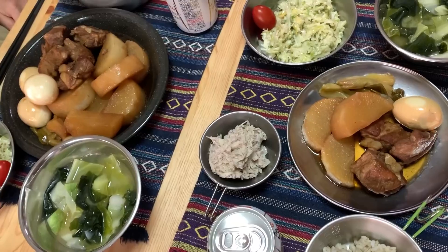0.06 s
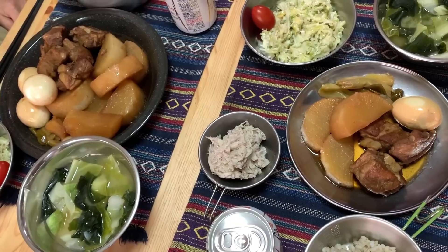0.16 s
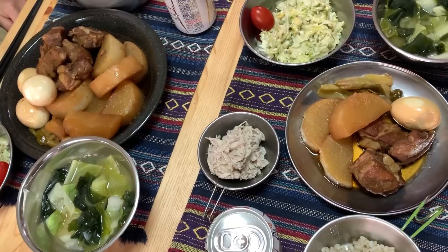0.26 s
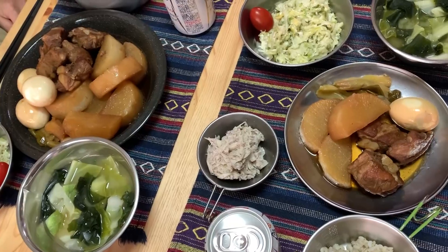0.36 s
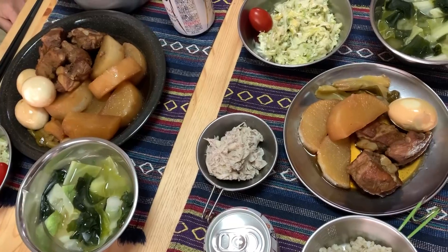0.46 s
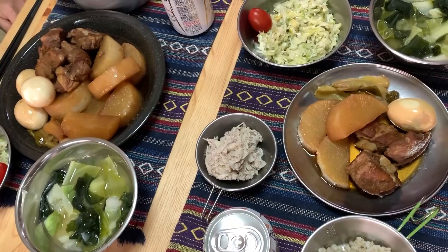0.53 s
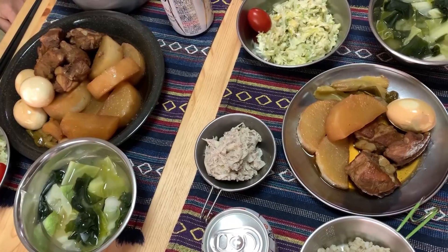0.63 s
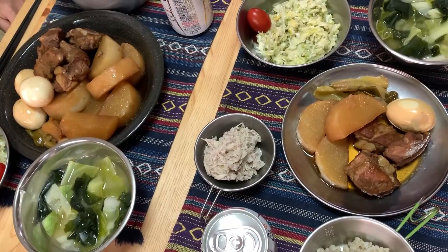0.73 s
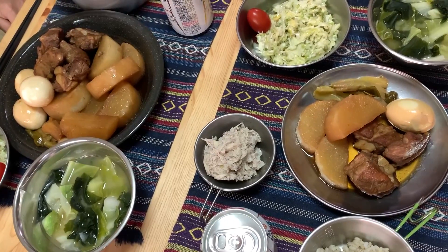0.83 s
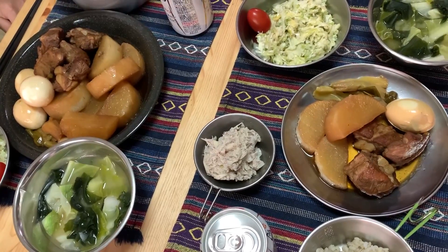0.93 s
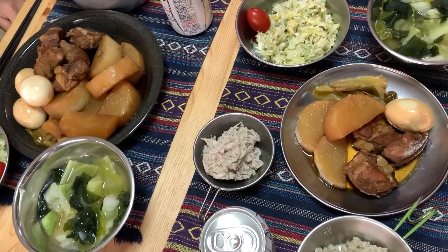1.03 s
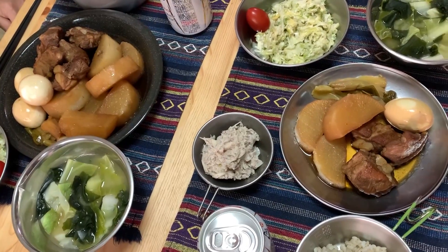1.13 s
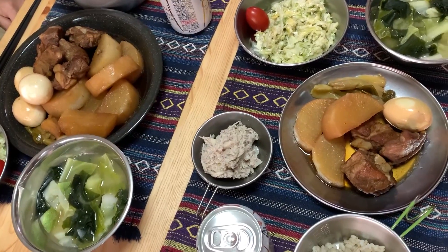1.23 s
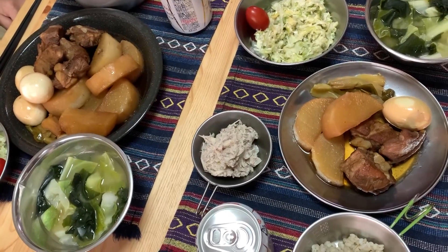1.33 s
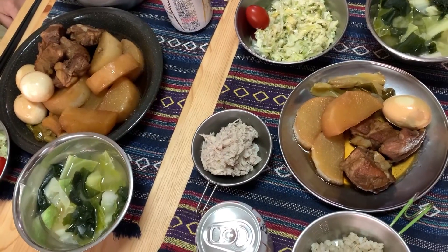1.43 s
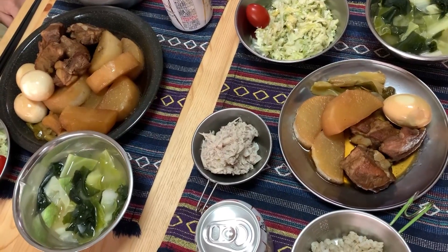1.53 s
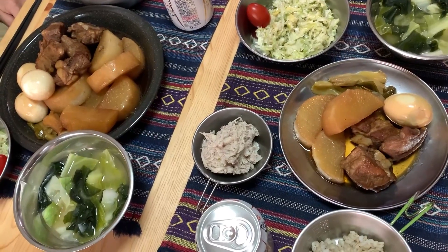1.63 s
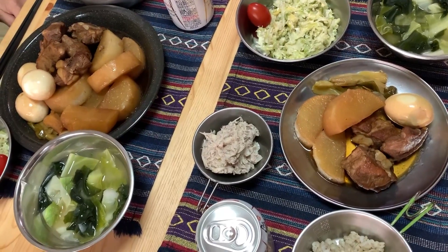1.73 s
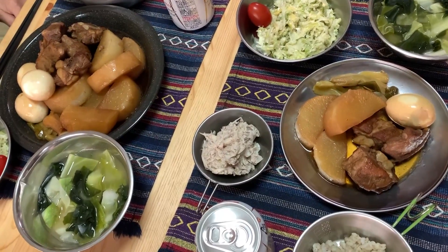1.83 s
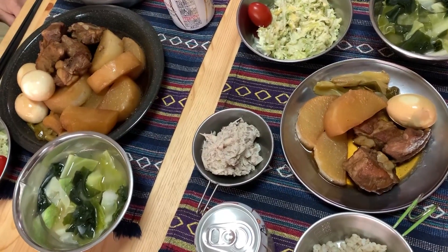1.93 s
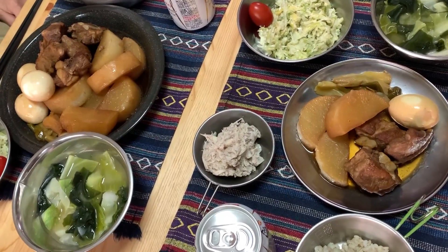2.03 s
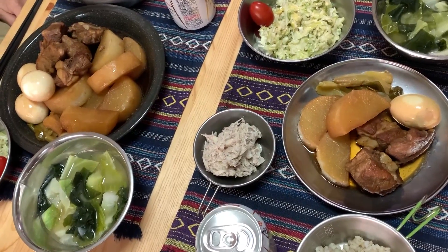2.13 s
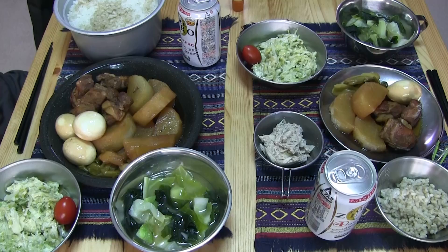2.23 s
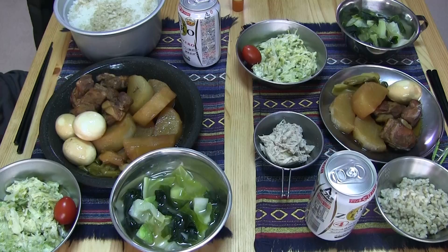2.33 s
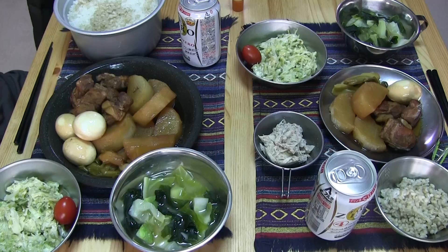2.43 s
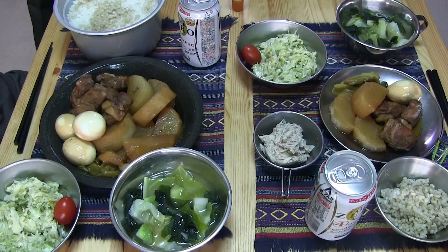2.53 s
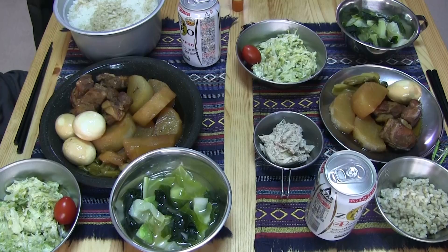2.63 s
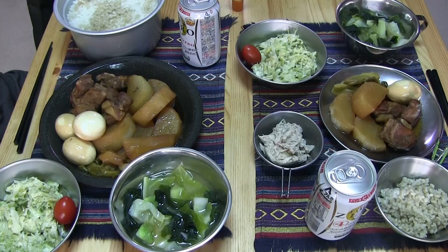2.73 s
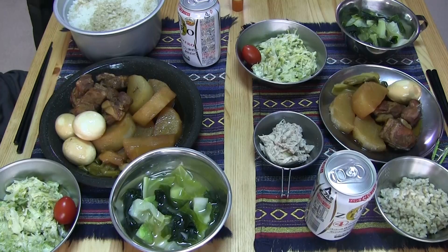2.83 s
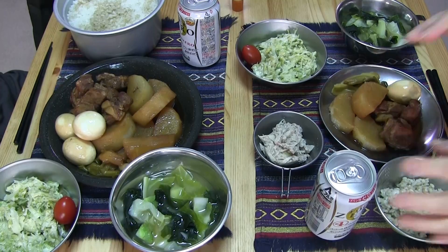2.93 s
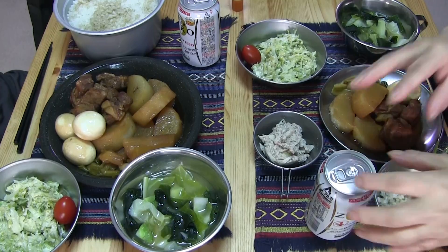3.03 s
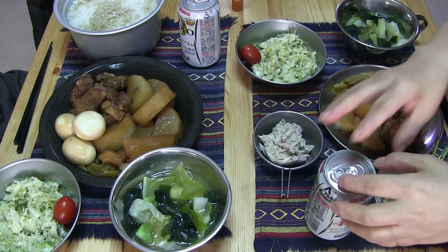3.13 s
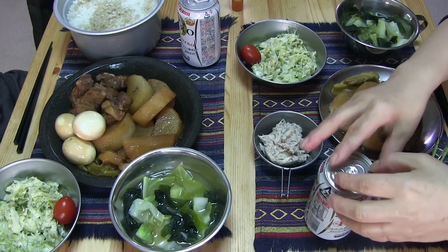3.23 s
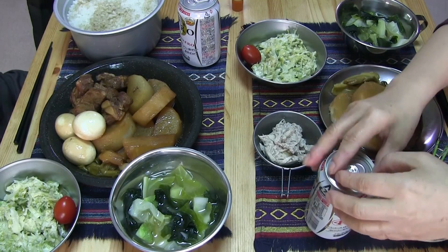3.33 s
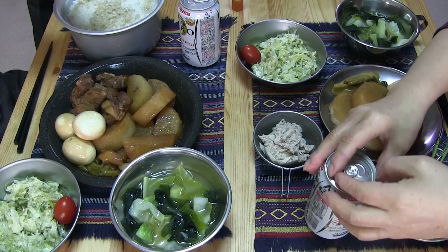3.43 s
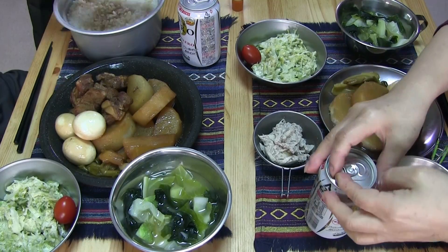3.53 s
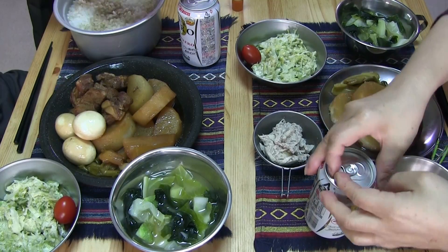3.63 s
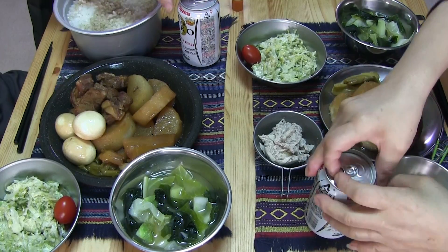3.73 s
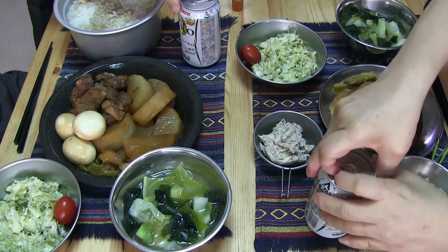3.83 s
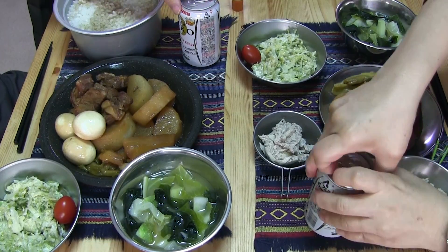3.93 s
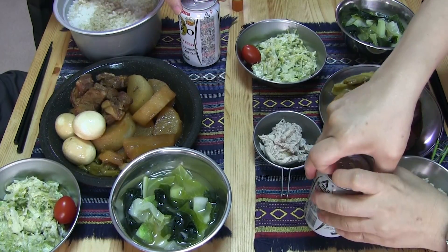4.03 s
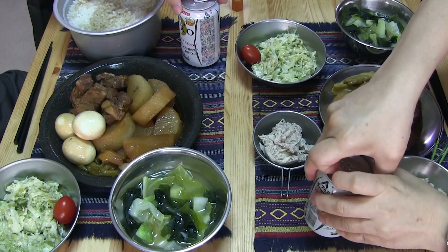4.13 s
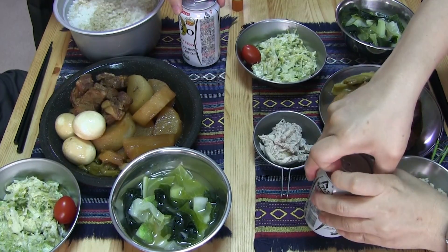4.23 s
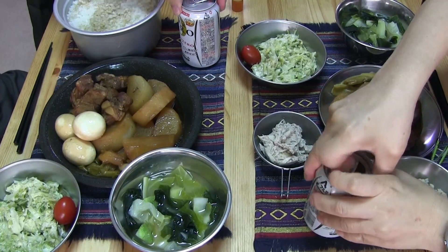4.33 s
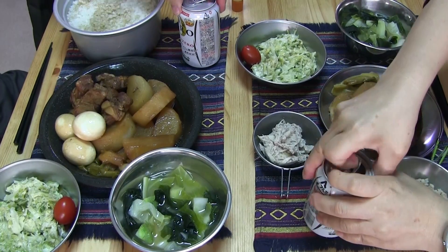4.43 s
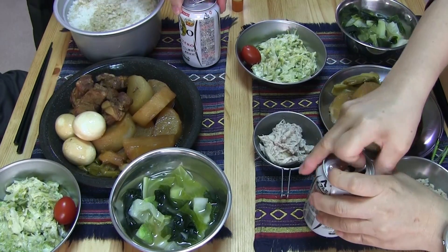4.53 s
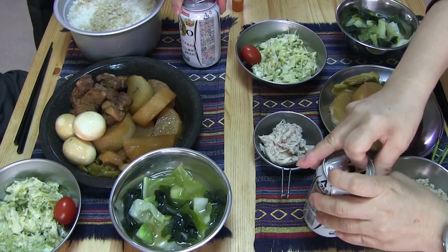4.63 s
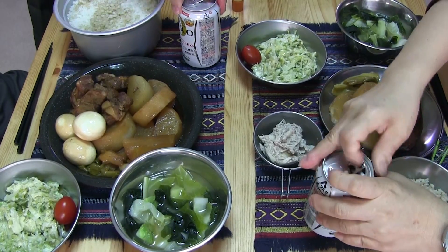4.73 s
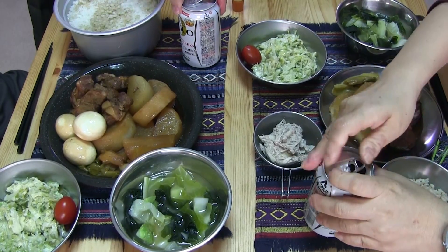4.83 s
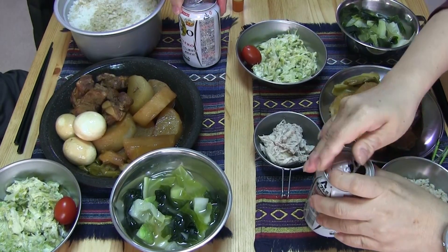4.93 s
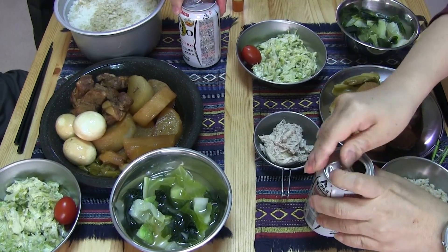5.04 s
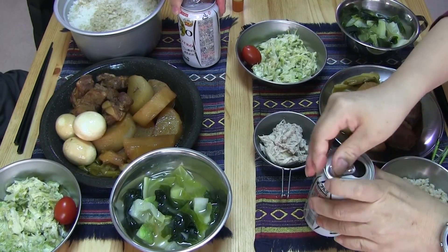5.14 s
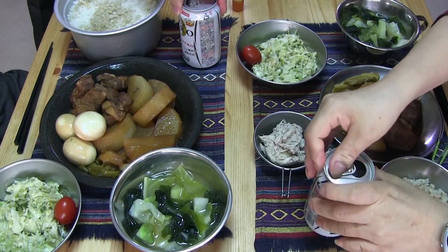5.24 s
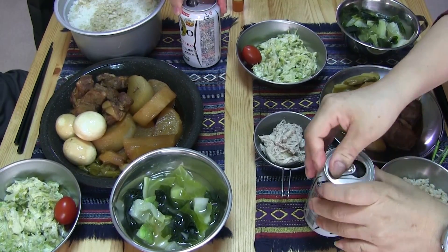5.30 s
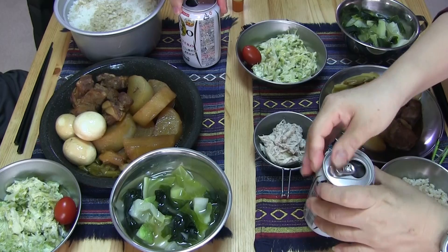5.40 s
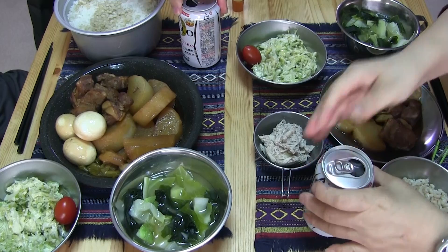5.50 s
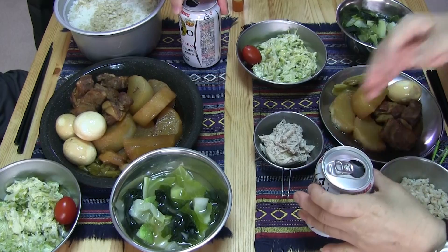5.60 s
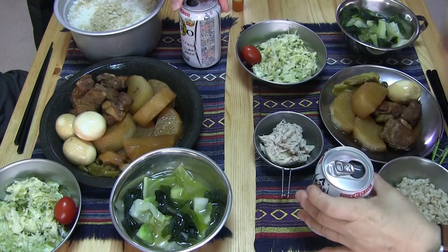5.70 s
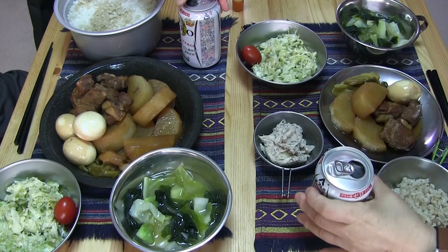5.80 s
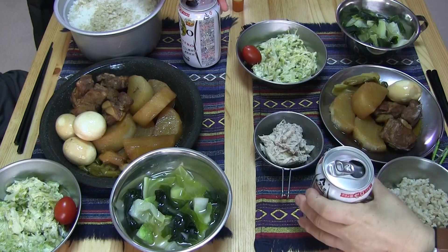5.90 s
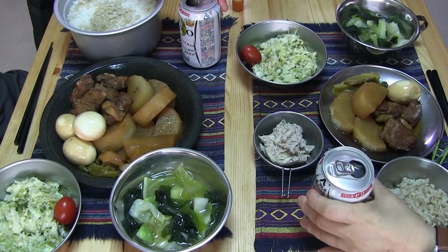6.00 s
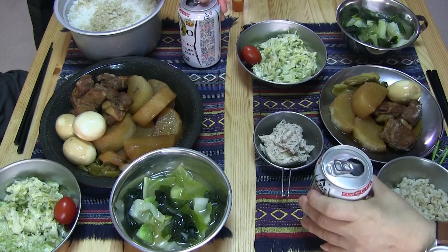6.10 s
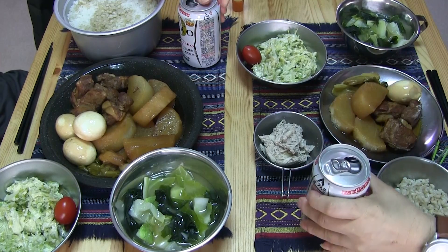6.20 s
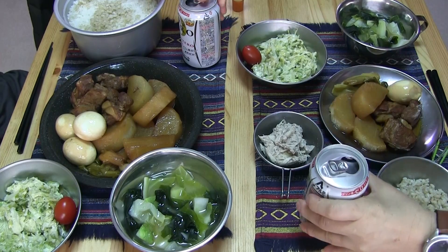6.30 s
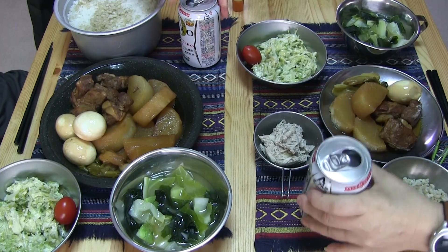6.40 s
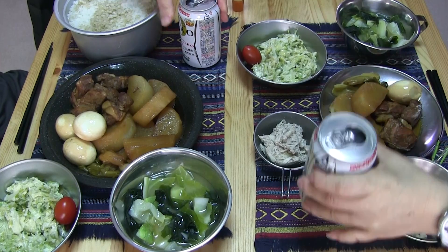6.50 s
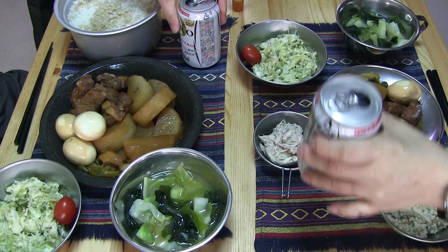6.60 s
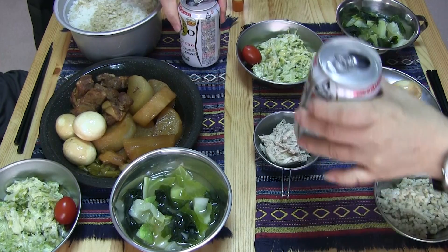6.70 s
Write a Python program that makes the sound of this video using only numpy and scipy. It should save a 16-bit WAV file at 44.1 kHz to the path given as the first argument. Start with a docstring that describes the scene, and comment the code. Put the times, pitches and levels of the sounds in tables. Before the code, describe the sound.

Close stereo pickup in a small, quiet dining room. First only dull hush and distant tinkling metal, then a clean break into airier background noise. Soft knocks and fingernail ticks on an aluminium can lead to a bright crack and brief gas spurt, a violent tinny snap, another crack with a longer hiss, and a second snap with a hollow can boom. The background dips after the loud peaks and slowly returns, with faint clinks.

```python
"""A dull hush with a thin whine and the faint clinks of a metal rod come first; then the hush breaks off and,
after a short silence, the scene changes: a louder, airy noise fills a small, quiet room. At a dining table
hands knock an aluminium drink can and pick at its tab; the seal cracks twice and lets gas hiss out, and the lid
tears open in two snaps. Blows are made of fading tones plus a burst of noise, gas and room of shaped noise.
Loud peaks make a gain control turn everything down; the room noise then creeps back."""
import sys
import numpy as np
from scipy import signal
from scipy.fft import rfft, irfft, next_fast_len
from scipy.io import wavfile
from scipy.ndimage import uniform_filter1d

SR = 44100
rng = np.random.default_rng(int(sys.argv[2]) if len(sys.argv) > 2 else 0)


def file_out(sig):
    """Save sig as 16-bit WAV at sys.argv[1]."""
    # one column per channel
    cols = np.atleast_2d(sig).T
    # limit, then scale
    lim = np.clip(cols, -1, 1)
    pcm = np.round(lim * 32767).astype(np.int16)
    wavfile.write(sys.argv[1], SR, pcm)


N = 298116
TIME = np.arange(N) / SR  # seconds
HUSH_END_S, AIR_START_S = 2.203, 2.236  # silence in between

# Levels of the sources are those before the final gain control.
# The two snaps that tear the lid. Each row: main jerk in seconds, its level in dB, brightness in dB per
# octave, ring length factor, noise against ring in dB, how much earlier the score first gives in seconds,
# level of that give in dB, time to the second jerk in seconds, fall per jerk in dB,
# boom of the body in dB, pop of the opening in dB.
LID_SNAPS = [(4.4526, -4, -2, .65, -1.5, 0.00075, -25.5, .0028, 4, -30, -23),
             (5.3113, -5, 3.5, 0.4, 2, .004, -9, .0018, 2, -16.5, -29)]
BOOM_NOISY_DB = -5  # noise against ring, for booms and pops

# Noise of metal being struck or torn. Each row: frequency in Hz, relative level in dB.
METAL_NOISE = [(100, -33.5), (500, -18), (1400, 4.5), (2300, 4.5), (4000, 7.5), (8000, 1), (12000, -0.5),
               (16000, -11.5)]
# Dull noise of a scuff. Each row: frequency in Hz, relative level in dB.
SCUFF_NOISE = [(50, -12.5), (120, -4.5), (450, -2.5), (1100, -1), (1900, -5), (2800, -18), (7000, -21.5),
               (15000, -35.5)]


def tears():
    """The lid tears along its score: every jerk rings the many short tones of the thin sheet."""
    # Tones of the lid. Each row: frequency in Hz, relative level in dB, time to fade by 60 dB in seconds.
    lid = [(820, -13, 0.014), (1082, -6.5, 0.09), (1270, -5.5, 0.049), (1580, 3.5, 0.0023),
           (2150, -1.5, .022), (2400, -13.5, 0.004), (3180, -2.5, 0.023), (3760, -4, .014),
           (4030, 0, 0.053), (4500, -8.5, 0.0089), (4330, -1, 0.011), (5460, -12.5, 0.0083),
           (6200, -5, 0.0099), (6880, 2.5, .014), (7500, -8, 0.014), (8600, -9, 0.0077), (8650, -0.5, .014),
           (10740, 2.5, .012), (12900, -15.5, .01)]
    return strike(jerks(), lid, METAL_NOISE, crunch_s=0.0075, split=0.045, contact_s=0.00024)


def jerks(count=4):
    """In a snap the score gives a little, then rips in jerks that grow weaker and slightly closer together."""
    spacing_power = 0.9  # below 1, so the gaps shrink
    blows = []
    for s, db, bright_db, ring, noisy_db, lead_s, give_db, gap_s, fall_db, *_ in LID_SNAPS:
        first_give = [(s - lead_s, give_db, bright_db)]
        run = [(s + gap_s * k ** spacing_power, db - fall_db * k, bright_db) for k in range(count)]
        blows += alike(first_give + run, ring, noisy_db)
    return blows


def booms():
    """Each snap sets the body of the can booming, just after the main jerk."""
    # Tones of the body. Each row: frequency in Hz, relative level in dB, time to fade by 60 dB in seconds.
    body = [(143.7, 1.5, 0.42), (196, -6.5, .15), (250, -5.5, 0.23), (656, -3.5, 0.061)]
    lag_s, ring_factor = .002, 0.62
    blows = [(s + lag_s, db, 0, ring_factor, BOOM_NOISY_DB) for s, *_, db, _ in LID_SNAPS]
    return strike(blows, body, SCUFF_NOISE, crunch_s=.006, split=.03, contact_s=0.00041)


def pops():
    """The air in the opening pops with each snap, ringing at two low tones."""
    # Tones of the air. Each row: frequency in Hz, relative level in dB, time to fade by 60 dB in seconds.
    mouth = [(710, -1, .03), (1111, 0, .02)]
    blows = [(s, db, 0, 1, BOOM_NOISY_DB) for s, *_, db in LID_SNAPS]
    return strike(blows, mouth, SCUFF_NOISE, crunch_s=.006, split=0.055, contact_s=.0005)


def cracks():
    """The scored seal cracks under pressure, with very short, bright rings."""
    # Each row: start in seconds, level in dB, brightness in dB per octave, ring length factor,
    # noise against ring in dB.
    crack_events = [(4.1917, -18.5, -5, 1.5, -2.5), (4.1983, -27.5, 2.5, 1.6, -5),
                    (4.8641, -11, 7, 1.1, -3.5), (4.8705, -29, 9, 1.2, -2.5)]
    # Tones of the seal. Each row: frequency in Hz, relative level in dB, time to fade by 60 dB in seconds.
    seal = [(3500, -2, 0.011), (4030, -1, 0.032), (4700, 2, 0.0089), (5260, -8.5, 0.036),
            (6230, -5, 0.0037), (7460, -3.5, .006), (8800, -4.5, .006), (10400, -5.5, .004)]
    # Noise of the crack. Each row: frequency in Hz, relative level in dB.
    seal_noise = [(300, -22.5), (2500, -19), (3400, 0), (8000, -2), (12000, -6.5), (16000, -10.5)]
    return strike(crack_events, seal, seal_noise, crunch_s=0.0029, split=0.07, contact_s=.0001)


def gas():
    """Gas escapes through the slit after each crack of the seal."""
    # Each row: slit opens in seconds, time constant of the rise in seconds, slit slackens in seconds,
    # jet in dB and spray in dB against the jet (both at full flow), scatter of droplet sizes in dB.
    vents = [(4.212, 0.016, 4.273, -17.5, -12.5, 0.5), (4.911, 0.015, 5.081, -18, -27, 7.5)]
    return sum(vent(*row) for row in vents)


def vent(opens_s, attack_s, slackens_s, jet_db, spray_db, grain_db):
    """Gas rushes through the slit as a bright jet and spits a spray of tiny droplets."""
    # Sound of the jet. Each row: frequency in Hz, relative level in dB.
    jet_spectrum = [(500, -41), (2600, -26.5), (4000, -15), (5500, -8.5), (7400, -7.5), (8600, -0.5),
                    (9800, 0.5), (11500, 0), (14000, -1), (16000, -10)]
    # Sound of the droplets. Each row: frequency in Hz, relative level in dB.
    spray_spectrum = [(200, -10), (700, -7), (1400, -0.5), (2200, -0.5), (4000, 1.5), (7000, -3.5),
                      (15000, -19)]
    release_db_per_s = 401
    opening = 1 - np.exp(-np.maximum(TIME - opens_s, 0) / attack_s)
    flow = opening * undb(-release_db_per_s * np.maximum(TIME - slackens_s, 0))
    # the jet flutters by a fraction of a dB
    flutter = undb(0.6 * unit(uniform_filter1d(rng.standard_normal(N), size=200)))
    jet = colour(rng.standard_normal(N), jet_spectrum) * flutter
    # a droplet falls on about 15 in 100 samples
    present = rng.random(N) < .15
    drops = rng.standard_normal(N) * present * undb(grain_db * rng.standard_normal(N))
    spray = undb(spray_db) * colour(drops, spray_spectrum)
    return flow * undb(jet_db) * (jet + spray)


def picks():
    """A fingernail picks at the tab, which rings higher once it is bent up, and skids over the lid."""
    # Each row: start in seconds, level in dB, brightness in dB per octave, pitch factor.
    pick_events = [(3.255, -34.5, 3.5, 1.04), (3.274, -37, 0, 1.06), (3.404, -51, -7, 1.06),
                   (3.8302, -37, 10, 0.98), (4.323, -41, 4, 1.02), (4.381, -47, 7, 0.9),
                   (4.425, -42, 3, 1.08), (4.4435, -38, 3, 1), (5.26, -43.5, -6, 1.7),
                   (5.2825, -38.5, -2, 1.65), (5.975, -52, -2, 1.38)]
    # Tones of the tab. Each row: frequency in Hz, relative level in dB, time to fade by 60 dB in seconds.
    tab = [(2280, 3.5, 0.12), (3510, -1, 0.076), (5080, -4.5, 0.069), (5600, -3, .04), (7130, -6, 0.042),
           (8350, -12.5, .04)]
    blows = alike(pick_events + skids(), ring=0.97, noisy_db=-3)
    return strike(blows, tab, METAL_NOISE, crunch_s=0.017, split=.03, contact_s=.0004)


def skids(count=7):
    """Unevenly spaced ticks that fade as the nail comes to rest."""
    # Each row: start in seconds, length in seconds, level at the start in dB.
    skid_events = [(3.284, .22, -46), (3.845, .26, -48.5)]
    fade_db = 12  # over the whole skid
    bright_db = 4  # per octave
    ticks = []
    for s, length, db in skid_events:
        # squaring crowds the ticks together at the start
        progress = ((np.arange(count) + rng.random(count)) / count) ** 2
        ticks += [(s + length * p, db - fade_db * p, bright_db) for p in progress]
    return ticks


def flexes():
    """The thin wall flexes under the fingers and rings higher where it is taut."""
    # Each row: start in seconds, level in dB, brightness in dB per octave, noise against ring in dB,
    # pitch factor.
    flex_events = [(4.665, -33, 17, 13, 0.49), (4.8595, -29, -13, -9, 0.98), (5.135, -43, 14.5, 2, 1.12),
                   (5.1736, -43, -6, -9, 1.18), (5.2075, -35.5, 0.5, -15.5, 1.05),
                   (5.8305, -34.5, -3.5, -9.5, 1.04)]
    # Tones of the wall. Each row: frequency in Hz, relative level in dB, time to fade by 60 dB in seconds.
    wall = [(1090, -0.5, 0.15), (1390, -4.5, 0.078), (1390, -9.5, 0.045), (2250, -8, .05),
            (3330, -3.5, 0.021)]
    # Noise of the flexing. Each row: frequency in Hz, relative level in dB.
    wall_noise = [(200, -10.5), (800, -14), (1400, -1), (3100, -3), (4200, -14), (8000, -17),
                  (15000, -35.5)]
    ring_factor = .55
    blows = [(s, db, bright_db, ring_factor, noisy_db, pitch)
             for s, db, bright_db, noisy_db, pitch in flex_events]
    return strike(blows, wall, wall_noise, crunch_s=.008, split=0.051, contact_s=0.00083)


def knocks():
    """The hand knocks and scuffs the can on the table, which answers with low, short tones."""
    # Each row: start in seconds, level in dB, brightness in dB per octave.
    knock_events = [(3.187, -32, 5), (3.205, -49, 15), (3.28, -39, -5), (3.296, -42.5, -2),
                    (4.832, -47, -12.5)]
    # Tones of the table. Each row: frequency in Hz, relative level in dB, time to fade by 60 dB in seconds.
    table = [(116, -13.5, 0.22), (203, -22.5, 0.14), (314, 5.5, 0.28), (503, 7, 0.3), (803, 11, .06),
             (1107, 14, 0.03), (1423, -6, 0.061), (1970, -5, 0.058)]
    blows = alike(knock_events, ring=.9, noisy_db=4.5)
    return strike(blows, table, SCUFF_NOISE, crunch_s=0.03, split=0.17, contact_s=0.00078)


def can():
    """All sounds of the can, close by on the table, with their echoes in the room."""
    # The hands shade one side of the can. Each row: time in seconds, left minus right in dB.
    shade = [(3.8, 1.5), (4.19, -5), (4.24, -1.5), (4.45, -2), (4.86, 0.5), (5.3, 1)]
    shade_db, = curve(shade)
    handling = knocks() + picks() + flexes() + pops()
    cracking, tearing, booming, hiss = cracks(), tears(), booms(), gas()
    # each part of the can radiates its own way; the long waves of the boom reach both channels alike
    direct = near(handling, shade_db, spread=.25) + near(cracking, shade_db, spread=.35)
    direct = direct + near(tearing, shade_db, spread=0.46) + near(hiss, shade_db, spread=.25) + booming
    into_room = undb(1.5) * handling + undb(-0.5) * cracking + undb(1) * tearing
    into_room = into_room + undb(-3.0) * hiss + undb(-16) * booming
    return direct + room(into_room)


def rod():
    """A small metal rod rings faintly far off to the left: it reaches the right later, and the walls echo it."""
    # Clinks, and at 0.60 s a soft swell of the lowest tone.
    # Each row: start in seconds, level in dB before the drops and gains below, brightness in dB per octave.
    rod_events = [(0.173, -60.5, 3), (.286, -58.5, 0.5), (.515, -52.5, -4.5), (.60, -54.5, -28),
                  (.70, -44, -1), (1.185, -51, 2), (1.302, -49.5, 4), (1.77, -52.5, 2.5),
                  (1.895, -50.5, 1.5), (2.104, -60, 0), (6.185, -50.5, -0.5), (6.675, -51.5, 3)]
    # Tones of the rod. Each row: frequency in Hz, relative level in dB, time to fade by 60 dB in seconds.
    rod_tones = [(2079, -6, 0.44), (5580, 1.5, 0.15), (9940, -9, 0.091), (10200, -5.5, 0.057),
                 (10700, -18, 0.064), (15200, -13, 0.12)]
    right_lag_s = .00046
    # every sound is a short, soft, wavering ring built from three overlapping onsets: (seconds later, dB)
    onset_steps = [(0, -2.5), (.017, -9.5), (.038, -6.5)]
    onsets = [(s + lag, db + drop_db, bright_db)
              for s, db, bright_db in rod_events for lag, drop_db in onset_steps]
    rings = strike(alike(onsets, ring=0.9, noisy_db=-21.5), rod_tones, METAL_NOISE,
                   crunch_s=0.0082, split=0.0015, contact_s=0.001)
    left = undb(-4.5) * rings
    right = undb(-4) * np.roll(rings, int(right_lag_s * SR))
    return np.array([left, right]) + undb(4) * room(rings)


def rustles():
    """Brief soft swishes in the room: noise that swells and sinks."""
    # Each row: loudest moment in seconds, level there in dB, length in seconds (peak to about a third).
    rustle_events = [(0.33, -72, 0.024), (0.397, -74, 0.054), (2.294, -47.5, 0.023)]
    spectrum = [(100, 5), (400, 8.5), (1200, 10.5), (2000, 4.5), (3000, -10), (12000, -15)]  # Hz, dB
    return swells(rustle_events) * colour(diffuse(N), spectrum)


def background():
    """A dull hush with a thin whine breaks off; after it comes a louder, airy room noise."""
    # Sound of the hush. Each row: frequency in Hz, relative level in dB.
    hush_spectrum = [(25, -58), (50, -18.5), (75, -22.5), (105, -9), (140, -8.5), (260, -17.5),
                     (400, -24.5), (800, -32), (1400, -38), (3000, -45.5), (11000, -54), (15000, -52)]
    # Sound of the airy noise. Each row: frequency in Hz, relative level in dB.
    air_spectrum = [(15, -31), (25, 3.5), (44, 3), (76, -11), (161, -4.5), (200, -13), (256, -6.5),
                    (293, -12.5), (354, -9), (405, -14.5), (575, -13.5), (1610, -23), (5000, -27.5),
                    (14000, -34), (16000, -45)]
    # Low rumbles swell and sink. Each row: loudest moment in seconds, level there in dB (before the
    # standing waves, during the hush), length in seconds (peak to about a third).
    rumble_events = [(1.775, -46, .03), (1.87, -47, .04), (2.15, -64.5, .15), (4.33, -53.5, .1),
                     (6.7, -49, .12)]
    hush = colour(diffuse(N, alike_hz=513, treble_side=1.0), hush_spectrum)
    # only the low drone of the house sways at random
    drone = signal.sosfiltfilt(signal.butter(2, 350, fs=SR, output="sos"), hush)
    drone_db = -61.5 + 2.2 * sway(per_s=9)  # before the standing waves
    whine = undb(-88.5) * np.sqrt(2) * np.sin(2 * np.pi * 1223 * TIME)
    hush = drone * undb(drone_db) + (hush - drone) * undb(-65) + whine
    air = colour(diffuse(N, alike_hz=230, treble_side=0.62), air_spectrum) * undb(-48)
    rumble_spectrum = [(15, -7.5), (40, 0.5), (70, -15.5), (170, -20.5), (400, -35), (2000, -75.0)]  # Hz, dB
    rumble = colour(diffuse(N, alike_hz=100), rumble_spectrum)
    surge = swells(rumble_events)
    before, after = TIME < HUSH_END_S, TIME > AIR_START_S
    # a weak steady rumble lies under each noise
    hush = standing_waves(before * (hush + rumble * (surge + undb(-86))))
    air = air + rumble * (surge + undb(-66.5))
    return hush * before + air * after


def standing_waves(x):
    """The room favours a few low notes and thins out the bass between them."""
    # Each row: frequency in Hz, width in Hz, level of the added peak in dB.
    waves = [(49.8, 16, 5.5), (89.6, 11, 2.5), (119, 4.5, -1.5), (145, 3.4, 5), (171.3, 4.8, 4.5),
             (262, 12.3, 3), (342.4, 20, -4.5)]
    between_db = -2
    bins = np.fft.rfftfreq(N, 1 / SR)
    peaks = sum(undb(db) / (1 + (2 * (bins - hz) / width) ** 2) for hz, width, db in waves)
    between = undb(np.interp(bins, [20, 60, 300, 500], [-15, between_db, between_db, 0]))
    return irfft(rfft(x) * (between + peaks), N)


def room(x):
    """Dense echoes of a small room, band by band, each fading at its own pace."""
    # Each row: band centre in Hz, time to fade by 60 dB in seconds, relative level in dB.
    bands = [(150, 0.45, 3), (510.3, .3, -5.5), (1403, .33, -6), (3500, 0.26, -7), (8000, 0.24, -6.5),
             (15100, 0.2, -15)]
    t = np.arange(SR // 2) / SR
    hz, t60, db = np.transpose(bands)
    bins = np.log(np.fft.rfftfreq(len(t), 1 / SR) + 1)
    noise = rfft(diffuse(len(t), alike_hz=641, treble_side=0.56))
    # the echoes set in 4 ms after the sound
    build_up = np.clip((t - .004) / 0.00057, 0, 1)
    response = 0
    for share, decay_s, band_db in zip(np.eye(len(hz)), t60, db):
        fade = build_up * np.exp(-np.log(1000) * t / decay_s)
        band = irfft(noise * np.interp(bins, np.log(hz), share), len(t))
        response = response + undb(band_db) * band * fade / np.linalg.norm(fade)
    return signal.fftconvolve(x[None], response, axes=1)[:, :N]


def near(x, pan_db, spread):
    """A close source: left and right hear different faces of it, shifted in phase, then panned."""
    sides = np.array([[1], [-1]])
    scatter = rng.standard_normal(97) * np.hanning(97)
    # this mirrored shape shifts the phase without favouring a side
    scatter = scatter - scatter[::-1]
    side = np.convolve(x, scatter / np.linalg.norm(scatter), "same")
    return (x + spread * sides * side) * undb(sides * pan_db / 2)


def strike(events, modes, crunch, crunch_s, split, contact_s):
    """Each blow rings the modes and crunches briefly; its dB is its energy spread over 10 ms."""
    out = np.zeros(N + SR)
    hz, db, t60 = np.transpose(modes)[:, :, None]
    t = np.arange(next_fast_len(int(SR * min(t60.max() + 6 * crunch_s, .5)))) / SR
    # a softer contact starts the sound more gently
    attack = (1 - np.exp(-t / contact_s)) ** 2
    for s, blow_db, bright_db, length, noisy_db, *pitch in events:
        # each mode is split at random into three close partials
        detune = 1 + split * rng.uniform(-1, 1, (3, len(hz), 1))
        pitches = hz * (pitch[0] if pitch else 1) * detune
        partials = np.cos(2 * np.pi * pitches * t).sum(axis=0) * rng.choice([-1, 1], hz.shape)
        gain = undb(db + bright_db * np.log2(hz / hz[0]))
        fade = np.exp(-np.log(1000) * t / (t60 * length))
        ring = attack * np.sum(gain * partials * fade, axis=0)
        hiss = colour(rng.standard_normal(SR // 2), crunch)[:len(t)]
        noise = attack * hiss * np.exp(-t / (crunch_s * length))
        blow = unit(unit(ring) + undb(noisy_db) * unit(noise)) * np.sqrt(.01 / t[-1])
        start = int(s * SR)
        out[start:start + len(t)] += undb(blow_db) * blow
    return out[:N]


def alike(rows, ring, noisy_db):
    """Blows of one kind share their ring length factor and noise against ring; a pitch factor may follow."""
    return [(s, db, bright_db, ring, noisy_db, *pitch) for s, db, bright_db, *pitch in rows]


def diffuse(size, alike_hz=600, treble_side=.55):
    """Stereo noise from all directions: left and right agree in the bass, less in the treble."""
    mid, side = rng.standard_normal((2, size))
    side = signal.sosfilt(signal.butter(1, alike_hz, "high", fs=SR, output="sos"), side)
    return mid + treble_side * side * np.array([[1], [-1]])


def colour(x, points):
    """Give a signal a spectrum from (Hz, dB) points; rms 1."""
    hz, db = np.transpose(points)
    bins = np.fft.rfftfreq(x.shape[-1], 1 / SR)
    gain = undb(np.interp(np.log(bins + 1), np.log(hz), db))
    return unit(irfft(rfft(x) * gain, x.shape[-1]))


def swells(rows):
    """Gain of smooth bell-shaped swells, each given as (peak s, dB, length s)."""
    return sum(undb(db) * np.exp(-((TIME - s) / length) ** 2) for s, db, length in rows)


def sway(per_s):
    """Random wander with a spread near 1, heading for a new value per_s times a second."""
    return np.interp(TIME * per_s, np.arange(256), rng.standard_normal(256))


def curve(rows):
    """The columns of a table joined by straight lines in time."""
    s, *columns = np.transpose(rows)
    return [np.interp(TIME, s, c) for c in columns]


def undb(db):
    """Decibels to gain."""
    return 10 ** (np.asarray(db) / 20)


def unit(x):
    """Scale to rms 1."""
    return x / np.sqrt(np.mean(x ** 2))


def scene():
    """The can, the far rod and the room noise; all falls silent for a moment when the hush breaks off."""
    sounding = (TIME < HUSH_END_S) | (TIME > AIR_START_S)
    return (can() + rod() + rustles() + background()) * sounding


def gain_control(x, limit_db=-14, range_db=11, recover_db=3.0):
    """Loud peaks pull the gain down at once; it recovers by recover_db a second."""
    power = np.abs(uniform_filter1d(np.mean(x ** 2, axis=0), size=300))
    loud_db = 10 * np.log10(power + 1e-12)
    cut_db = np.clip(loud_db - limit_db, 0, range_db)
    held_db = np.maximum.accumulate(cut_db + recover_db * TIME) - recover_db * TIME
    return x * undb(-held_db)


def record(dry):
    """Gain control, clipping just under full scale and a steep top cut."""
    clipped = np.clip(gain_control(dry), -.92, .92)
    top_cut = signal.ellip(10, .2, 70, 16000, fs=SR, output="sos")  # above 16 kHz
    return signal.sosfilt(top_cut, clipped)


dry = scene()
out = record(dry)
file_out(out)
```